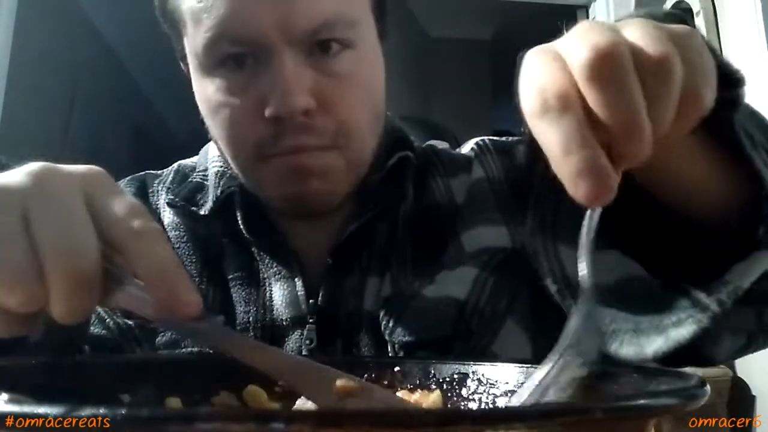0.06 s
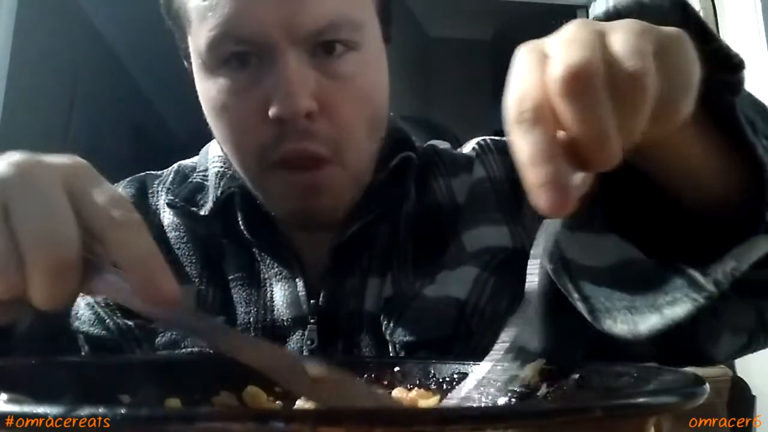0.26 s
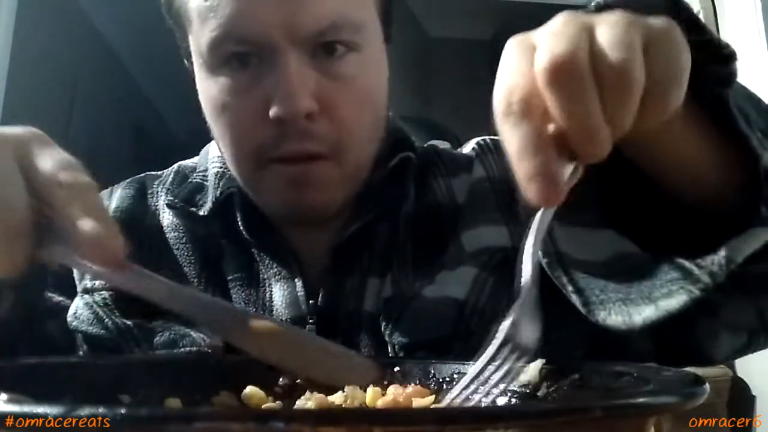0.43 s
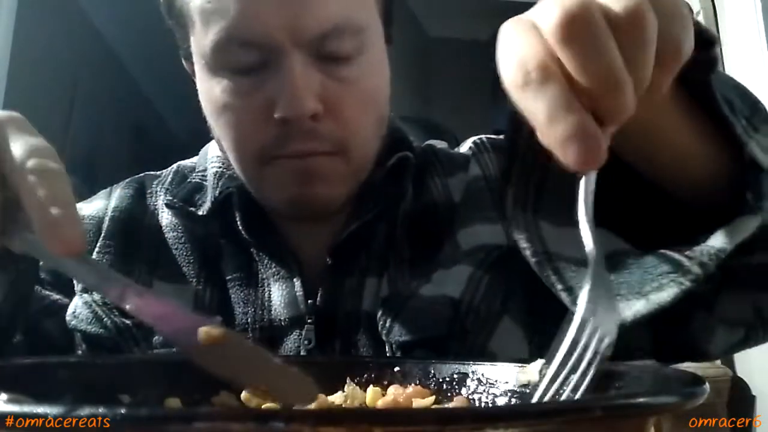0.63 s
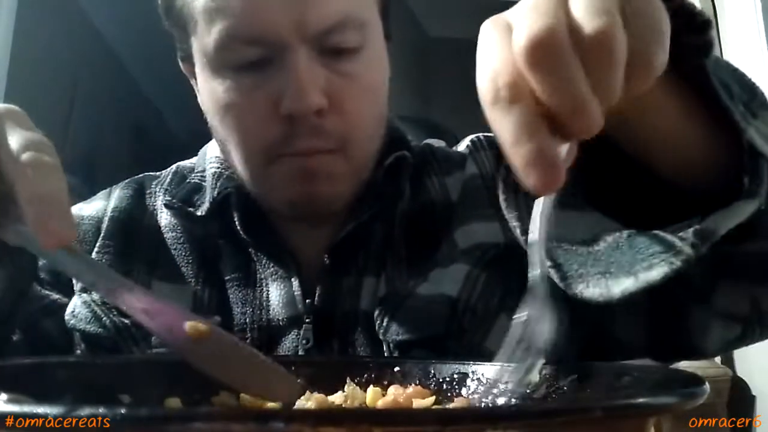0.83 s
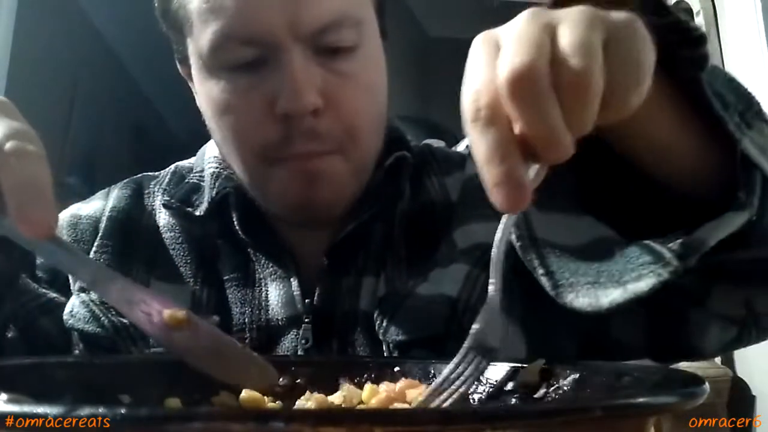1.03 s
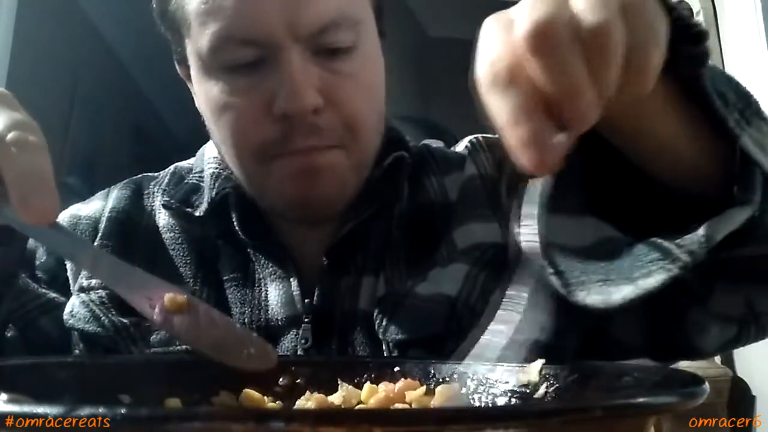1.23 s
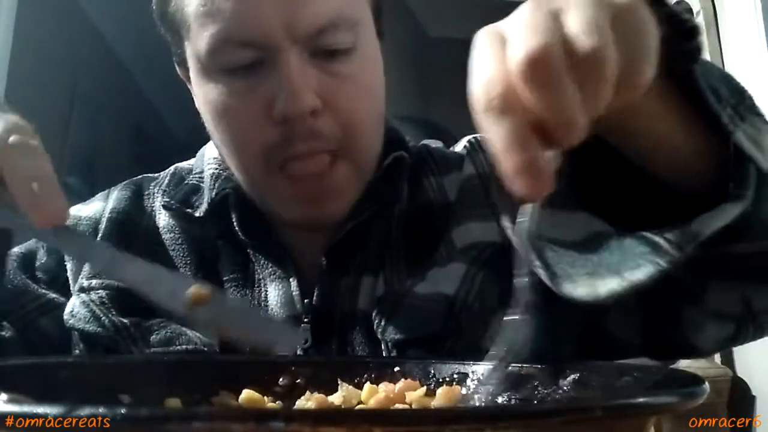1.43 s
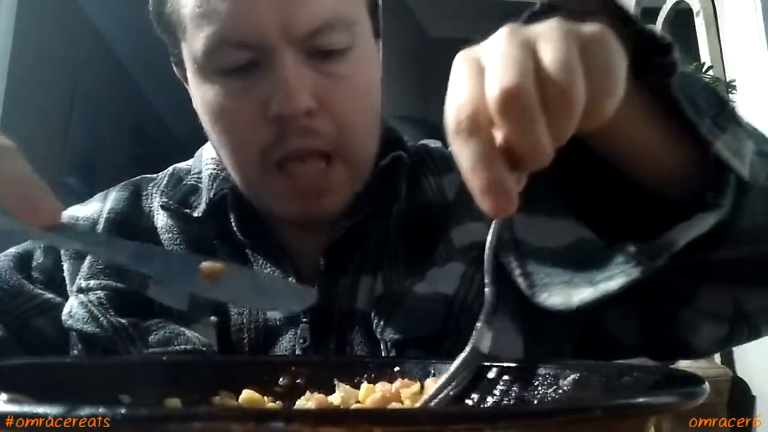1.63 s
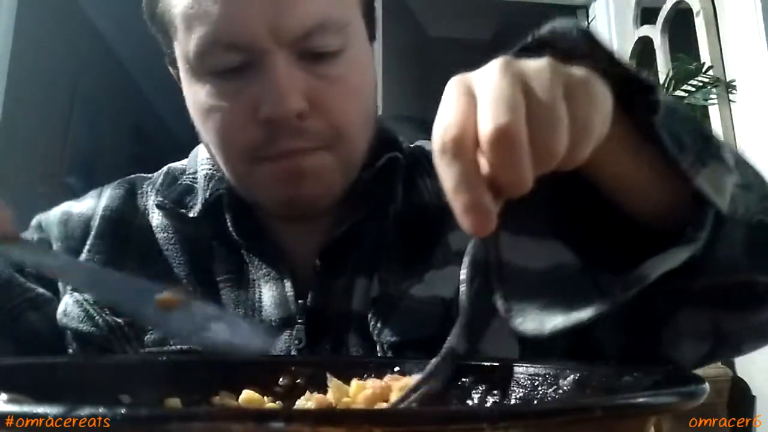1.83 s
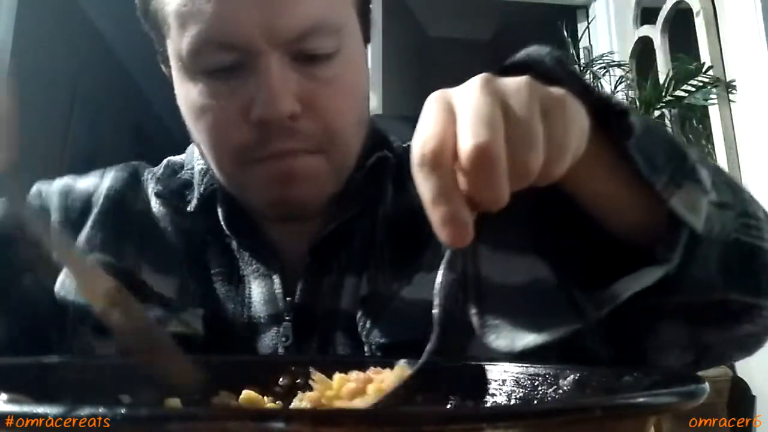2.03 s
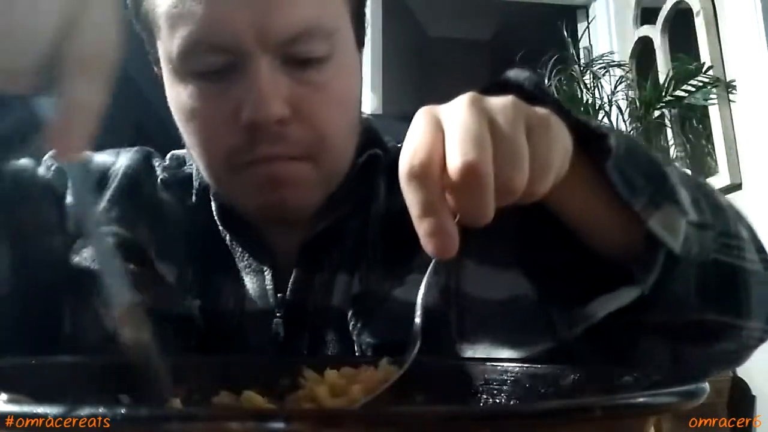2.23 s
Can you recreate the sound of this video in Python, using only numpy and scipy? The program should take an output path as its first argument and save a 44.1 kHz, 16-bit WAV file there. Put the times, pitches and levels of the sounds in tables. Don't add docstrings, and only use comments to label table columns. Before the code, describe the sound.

A fork rattles, taps and squeaks on a china plate, pauses, nudges moist food, clinks loudly on the rim, then a knife scrapes in stuttering catches; close stereo phone microphone in a small dull room.

```python
import sys
import numpy as np
from scipy import signal
from scipy.fft import rfft, irfft, next_fast_len
from scipy.io import wavfile
from scipy.ndimage import uniform_filter1d, map_coordinates

SR = 44100
rng = np.random.default_rng(int(sys.argv[2]) if len(sys.argv) > 2 else 0)


def gain_from_decibels(decibels):
    exponent = np.asarray(decibels, float) / 20
    return 10 ** exponent


def log_audio(samples):
    frames = np.atleast_2d(samples).T
    limited = np.clip(frames, -1, 1)
    pcm = np.round(limited * 32767).astype(np.int16)
    wavfile.write(sys.argv[1], SR, pcm)


N = 100062
TIME = np.arange(N) / SR

# (pitch [Hz], decay [s], left over right [dB], left phase lead [rad])
PLATE = [(350, .2, 4, -.2), (740, .13, -5, -.3), (766, .26, -9, -1.2), (1856, .25, 1, 2.6),
         (1908, .09, 3, -2.9), (3192, .16, -5, 1.6), (4820, .12, 1, .8), (6690, .11, 1, 1.5),
         (7677, .12, -6, 1.4), (8850, .09, 3, 2.7), (10030, .09, 5, -1.5), (11055, .11, 9, 1.1),
         (12370, .08, 3, .8), (13490, .12, 12, 1.7)]
# (level [dB]), one per mode
WELL = [-31.5, -7, -17, -26.5, 2, -11, -12, -18.5, -33, -21, -31.5, -28.5, -32.5, -33.5]
RIM = [-29, -16, -17.5, -3.5, -11.5, -5.5, -3.5, -23.5, -34, -10.5, -18, -16, -24, -24]
EDGE = [-26, -19.5, -37.5, -10, -13.5, 4, -24.5, 1, -25.5, -2.5, -20, -36.5, -26, -18.5]
MIDDLE = [-18, -14, -9, -12.5, 1, -15, -14.5, -17.5, -22, -16, -19.5, -16.5, -19.5, -14.5]
DRAG = [-30, -1.5, -25, -5, -11.5, 1.5, -8.5, -19.5, -28.5, -24.5, -39, -37.5, -42.5, -29]
SCRAPE = [-24.5, 0, -19, -3, -5, -6, -10, -21, -26.5, -17, -33.5, -31, -34, -27.5]
# (pitch [Hz], decay [s], left over right [dB], left phase lead [rad], level [dB])
FORK = [(1390, 0.022, 8, 1.5, -12), (2250, 0.035, 1, 1, -2.5), (2460, 0.033, 19.5, 7, -10),
        (3410, 0.028, 0.5, 9, 10), (4980, 0.027, -3, 1.9, -0.5)]
# (pitch [Hz], decay [s], level [dB])
TINES = [(6150, 0.055, -19.5), (7005, 0.041, -7.5), (7720, 0.03, -15.5), (8480, 0.086, -12.5),
         (8840, 0.067, -13.5), (9930, 0.034, -5.5), (11100, 0.032, -6.5), (11920, .05, -18.5),
         (12100, 0.044, -10), (12280, 0.054, -10.5), (12540, 0.077, -5), (13500, .04, -7.5),
         (14760, .05, -14), (15000, .05, -17.5)]
KNIFE = [(524, 0.022, -5), (1380, 0.018, -4), (1550, 0.018, 0), (2150, 0.022, 2), (2650, 0.0063, -15),
         (3580, 0.021, -15)]
TABLE = [(112, .15, -14), (162, 0.05, -11.5), (192.1, 0.09, -3.5), (333, 0.22, -12), (397, 0.056, -5),
         (440, 0.24, -17)]

# (time [s], level [dB])
WELL_TAPS = [
    (.048, -17),
    (.147, -22),
    (.193, -21.5),
    (.249, -23),
    (.274, -36),
]
MIDDLE_TAPS = [
    (0.7349, -17),
    (.7415, -26),
]
RIM_TAPS = [
    (1.4224, -7),
    (1.447, -44),
]
EDGE_TAPS = [
    (2.2595, -13),
]
FORK_TAPS = [
    (.0092, -14),
    (.0165, -20),
    (0.0197, -19.5),
    (0.0267, -23),
    (0.032, -22),
    (0.7984, -35),
]
# (time [s], level [dB])
LIFT = [
    (.307, -24.5),
]
# (time [s], level [dB])
THUDS = [(.01, -23.5), (.148, -33.5), (.735, -35.5), (.799, -40), (.877, -32.5), (.882, -24.5),
         (.905, -36.5), (.946, -25.5), (1.105, -57), (1.423, -28), (2.2, -35), (2.26, -42.5)]
# (time [s], level [dB])
CATCHES = [(1.6881, -29.5), (1.6926, -21.5), (1.7589, -31), (1.7734, -36), (1.8058, -30), (1.8248, -22),
           (1.8394, -25), (1.8607, -30.5), (1.8731, -21.5), (1.8844, -30), (1.914, -21), (1.9494, -32),
           (1.9684, -32), (1.9844, -24.5), (1.9944, -34), (2.0138, -26), (2.0527, -21), (2.1016, -26),
           (2.1294, -21.5), (2.2024, -34.5)]
# (time [s], length [s], level [dB], centre [Hz])
CRACKLES = [
    (0.457, 0.0085, -54.5, 2470),
    (0.484, 0.0019, -43.5, 2150),
    (0.585, 0.027, -49, 1550),
    (0.64, 0.0036, -51.5, 1300),
    (0.766, 0.03, -41, 1364),
    (0.863, 0.049, -50.5, 1120),
    (0.925, 0.049, -51.5, 1380),
    (1.112, 0.0071, -63, 760),
]

# (time [s], level [dB])
FORK_STROKE = [(.008, -70.5), (.012, -42), (.1, -31.5), (.16, -37.5), (.23, -34), (.26, -30.5), (.31, -44),
               (.34, -55.5), (.43, -68.5)]
NUDGE = [(.73, -74), (.745, -31.5), (.8, -35), (.85, -55.5), (.89, -53), (.95, -50), (1.03, -62),
         (1.06, -103)]
SETTLE = [(1.42, -77), (1.43, -21), (1.47, -45.5), (1.55, -52), (1.6, -65), (1.635, -100)]
KNIFE_STROKE = [(1.645, -77), (1.667, -44), (1.7, -48.5), (1.745, -67), (1.78, -49.5), (1.83, -46),
                (2.05, -44), (2.14, -44), (2.17, -49.5), (2.26, -55.5)]
WASH = [(.74, -65.5), (.8, -39.5), (.83, -64), (.87, -54), (.895, -45), (1.0, -57.5), (1.04, -71),
        (1.42, -120), (1.43, -28), (1.49, -42), (1.52, -63), (1.6, -63.5), (1.62, -88)]
# (time [s], level [dB])
SQUEAK = [(.06, -56.5), (.1, -28), (.135, -31), (.16, -51), (.19, -68)]
HUM = [(.735, -58), (.75, -38.5), (.775, -34), (.797, -42.5), (.812, -62), (1.03, -67)]
WHINE = [(2.07, -76), (2.08, -46.5), (2.097, -87), (2.113, -49.5), (2.14, -45.5), (2.18, -83), (2.25, -75)]
FIZZ = [(.3, -75.5), (.4, -62), (.48, -75), (.489, -55), (.51, -92.5), (1.655, -91.5), (1.667, -58),
        (1.715, -65), (1.76, -72.5), (1.82, -64.5), (1.84, -72), (2.03, -76), (2.25, -80)]
RUSTLE = [(1.47, -70), (1.5, -53), (1.54, -47), (1.57, -45.5), (1.6, -59), (1.625, -71.5)]
# (start [s], end [s])
SAG_S = [2.054, 2.056]

# (frequency [Hz], level [dB per Hz])
RASP_COLOUR = [(50, -21), (100, -28), (1500, 10.5), (2300, 4), (5000, -8), (5400, -67), (12000, -59),
               (16400, -65)]
BRIGHT_COLOUR = [(50, -36.5), (150, -32), (800, -12), (2500, -2.5), (5000, -11.5), (5800, -25.5),
                 (12500, -28), (16400, -47)]
FIZZ_COLOUR = [(6000, -28.5), (9500, -12.5), (11500, -7.5), (13500, 1), (15500, -5.5), (16400, -31.5)]
RUSTLE_COLOUR = [(100, -22.5), (350, 8.5), (600, -8), (1200, -4.5), (1800, -15.5), (5000, -32)]
HUSH_COLOUR = [(25, -1.5), (100, 2), (300, -5.5), (500, -18.5), (2000, -27.5), (16000, -32.5)]
# (frequency [Hz], width [Hz], depth [dB])
DIPS = [(4250, 200, 9), (5800, 300, 9), (8200, 150, 12), (9350, 170, 12)]
# (frequency [Hz], level [dB per bin])
SUPPRESS = [(25, -112), (2000, -100), (5000, -95), (16000, -103)]


def unit(x):
    return x / np.sqrt(np.mean(x ** 2) + 1e-20)


def level(rows):
    s, db = np.transpose(rows)
    return gain_from_decibels(np.interp(TIME, s, db, -150, -150))


def wobble(rate):
    knots = rng.standard_normal(int(N * rate / SR) + 4)
    return map_coordinates(knots, [np.arange(N) * rate / SR])


def coloured(x, points):
    m = next_fast_len(N + 8192)
    f, db = np.transpose(points)
    hz = np.fft.rfftfreq(m, 1 / SR)
    gain = gain_from_decibels(np.interp(np.log(hz + 1), np.log(f + 1), db, -120, -120))
    return irfft(rfft(x, m) * gain, m)[..., :N]


def strengths(modes):
    return [mode[-1] for mode in modes]


def ring(force, modes, shares_db, damp=1, place=None):
    rise_s = .0012
    cols = np.array(modes).T[:, None, :, None]
    hz, t60 = cols[:2]
    t = np.arange(int(SR * t60.max() * damp) + 1) / SR
    pan_db, lead = place or cols[2:4]
    side = np.array([.5, -.5])[:, None, None]
    # (pitch ratio, dB, decay, phase)
    twins = [(1, 0, 1, 1), (1.021, -8, .4, -1), (1 / 1.021, -8, .4, .5)]
    body = 0
    for ratio, db, loss, turn in twins:
        fade_db = 60 * t / (t60 * damp * loss)
        gain = gain_from_decibels(np.array(shares_db)[None, :, None] + db + side * pan_db - fade_db)
        tone = np.sin(2 * np.pi * hz * ratio * t + side * lead * turn)
        body = body + (gain * tone * (1 - np.exp(-t / rise_s))).sum(1)
    return signal.fftconvolve(force[None], body, axes=1)[:, :N]


def taps(rows, chatter_s=0.0057, blow=1):
    force, t = np.zeros(N + SR), np.arange(SR // 20) / SR
    for s, db in rows:
        push = 0.085 * rng.standard_normal(len(t)) * np.exp(-t / max(chatter_s, 1e-4))
        push[0] = blow
        force[round(s * SR):][:len(t)] += gain_from_decibels(db) * push
    return force[:N]


def grit(lumpy_db):
    slips_per_s, spread_db = 9000, 2.2
    moment, size, way = rng.random((N, 3)).T
    slips = (moment < slips_per_s / SR) * gain_from_decibels(-spread_db * np.log(size + 0.00047)) * np.sign(way - .5)
    return unit(slips * gain_from_decibels(lumpy_db * (wobble(90) + wobble(260))))


def rasp(force, spectrum, apart=0.5):
    left_lag = 8
    own = apart * np.abs(force) * rng.standard_normal((2, N))
    pair = np.array([np.roll(force, left_lag), force]) + own
    return coloured(pair, spectrum) / np.std(coloured(rng.standard_normal(N), spectrum))


def sing(rows, hz, drift_hz, pan_db, lead):
    side = np.array([[.5], [-.5]])
    phase = 2 * np.pi * np.cumsum(hz + drift_hz * wobble(77)) / SR
    return level(rows) * gain_from_decibels(0.73 * wobble(96) + side * pan_db) * np.sin(phase + side * lead) * 5


def quiet_hush():
    hush = rng.standard_normal(N) + 0.21 * rng.standard_normal((2, N))
    return gain_from_decibels(-63) * unit(coloured(hush, HUSH_COLOUR))


def room(x):
    decay_s, top_hz = 0.15, 3700
    t = np.arange(SR // 3) / SR
    noise = rng.standard_normal((2, len(t))) * gain_from_decibels(-60 * t / decay_s)
    tail = signal.lfilter(*signal.butter(1, top_hz, fs=SR), noise)
    late = np.pad(x, ((0, 0), (150, 0)))
    return gain_from_decibels(-14) * signal.fftconvolve(late, tail / np.linalg.norm(tail[0]), axes=1)[:, :N]


def thump(force, damp):
    return ring(force, TABLE, strengths(TABLE), damp, place=(4, .1))


def food():
    out, grains = np.zeros((2, N)), grit(0.27)
    for s, length, db, hz in CRACKLES:
        rise = np.clip((TIME - s) / 0.0042, 0, 1)
        fall = gain_from_decibels(-20 * np.clip((TIME - s - length) / 0.0072, 0, 9))
        colour = [(60, -14), (hz * .7, -17), (hz, 0), (min(hz * 1.4, 15000), -20), (16200, -40)]
        out += gain_from_decibels(db) * rise * fall * rasp(grains, colour, apart=1.0)
    return out


def squeak():
    tine_hz = 3509.4 - 1300 * (TIME - .13)
    out = sing(SQUEAK, tine_hz, 15, .1, 2.8)
    out += sing(HUM, 750, 5.5, -4.5, -1.7)
    return out + sing(WHINE, 3195, 6.7, -3, 2.3)


def ring_tines(force, damp=1):
    return ring(force, TINES, strengths(TINES), damp, place=(8.9, 1.5))


def fork_strokes():
    fork = level(FORK_STROKE) * grit(1.6)
    rest = (level(NUDGE) + level(SETTLE)) * grit(2.0)
    tines = fork * gain_from_decibels(-45 * TIME)
    tips = gain_from_decibels(-9) * fork * gain_from_decibels(-92 * TIME) + gain_from_decibels(-23.5) * level(WASH) * grit(0.52)
    out = gain_from_decibels(-8.5) * ring(tines, FORK, strengths(FORK), damp=0.36) + gain_from_decibels(-19.0) * rasp(tines, BRIGHT_COLOUR)
    out += ring_tines(tips, damp=0.55) + gain_from_decibels(-4.5) * rasp(tips, FIZZ_COLOUR)
    out += gain_from_decibels(-14.5) * ring(fork, PLATE, DRAG, damp=0.087) + gain_from_decibels(-2.0) * rasp(fork, RASP_COLOUR)
    out += gain_from_decibels(-18.0) * ring(rest, PLATE, MIDDLE, damp=0.29) + gain_from_decibels(-10.0) * rasp(rest, BRIGHT_COLOUR)
    return out + thump(gain_from_decibels(-36.0) * fork + gain_from_decibels(-28.5) * rest, damp=1.3)


def knife():
    judder = np.exp(-np.arange(SR // 20) / SR / 0.0052)
    bursts = np.abs(signal.fftconvolve(taps(CATCHES, chatter_s=0), judder)[:N])
    slips, press = grit(1.2), level(KNIFE_STROKE)
    force = (press + gain_from_decibels(-8) * bursts) * slips
    drag = (press + gain_from_decibels(-15) * bursts) * slips
    late = np.interp(TIME, SAG_S, [0, 1])
    sagged = np.array(KNIFE) * [0.922, 1, 1]
    shares, place = strengths(KNIFE), (1.5, -.3)
    blade = ring(force * (1 - late), KNIFE, shares, place=place)
    blade += ring(force * late, sagged, shares, place=place)
    out = gain_from_decibels(-19.5) * blade + gain_from_decibels(-24.5) * ring(drag, PLATE, SCRAPE, damp=0.5)
    out += gain_from_decibels(-11) * rasp(drag, RASP_COLOUR) + thump(gain_from_decibels(-35) * force, damp=1.3)
    out += rasp(level(FIZZ) * grit(2.5), FIZZ_COLOUR)
    return out + rasp(level(RUSTLE) * grit(2.7), RUSTLE_COLOUR)


def clinks():
    fork = taps(FORK_TAPS)
    places = [(WELL_TAPS, WELL), (MIDDLE_TAPS, MIDDLE), (RIM_TAPS, RIM), (EDGE_TAPS, EDGE)]
    out = sum(ring(taps(rows), PLATE, shares) for rows, shares in places)
    out += ring(taps(LIFT, chatter_s=0), PLATE[3:4], [0], damp=0.83)
    out += ring(fork, FORK, strengths(FORK), damp=0.84) + gain_from_decibels(-4) * ring_tines(fork)
    chatter = taps(WELL_TAPS + MIDDLE_TAPS + RIM_TAPS + EDGE_TAPS + FORK_TAPS, blow=0)
    out += gain_from_decibels(19.5) * rasp(chatter, BRIGHT_COLOUR)
    return out + thump(taps(THUDS, chatter_s=0), damp=1.0)


def scene():
    near = food() + squeak() + fork_strokes() + knife() + clinks()
    return quiet_hush() + room(near) + near


def ports(x):
    low_cut_hz = 68.5
    hz = np.fft.rfftfreq(N, 1 / SR)
    bass = hz ** 2 / (hz ** 2 + low_cut_hz ** 2)
    loss_db = sum(db * np.exp(-((hz - at) / width) ** 2) for at, width, db in DIPS)
    return irfft(rfft(x) * bass * gain_from_decibels(-loss_db), N)


def suppress(x):
    hz, _, z = signal.stft(x, SR, nperseg=512)
    f, db = np.transpose(SUPPRESS)
    power = uniform_filter1d((np.abs(z) ** 2).mean(0), size=5, axis=1)
    power = np.abs(uniform_filter1d(power, size=2, axis=0)) + 1e-20
    threshold = gain_from_decibels(2 * np.interp(np.log(hz + 1), np.log(f), db))[:, None]
    keep = np.clip(1 - threshold / power, gain_from_decibels(-24), 1)
    return signal.istft(z * keep, SR, nperseg=512)[1][:, :N]


def gate(dry):
    threshold_db, slope, floor_db, window_s, start_s = -58, 2.4, -24, .018, 0.0023
    power = uniform_filter1d((dry ** 2).mean(0), size=round(window_s * SR))
    loud_db = 10 * np.log10(np.abs(power) + 1e-14)
    gain = gain_from_decibels(np.clip(slope * (loud_db - threshold_db), floor_db, 0))
    return gain * (TIME > start_s)


def top_cut(x):
    return signal.sosfilt(signal.butter(12, 16500, fs=SR, output="sos"), x)


def record(dry):
    x = suppress(ports(dry)) * gate(dry)
    mix = x / (1 + np.abs(x) ** 10) ** (1 / 10)
    return top_cut(mix)


dry = scene()
out = record(dry)
log_audio(out)
```